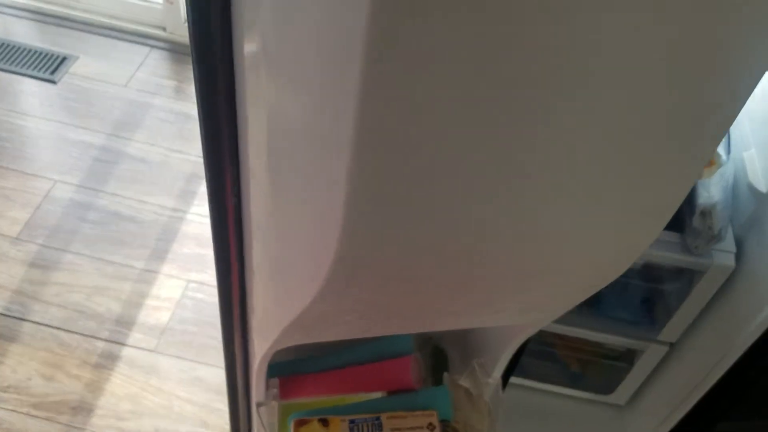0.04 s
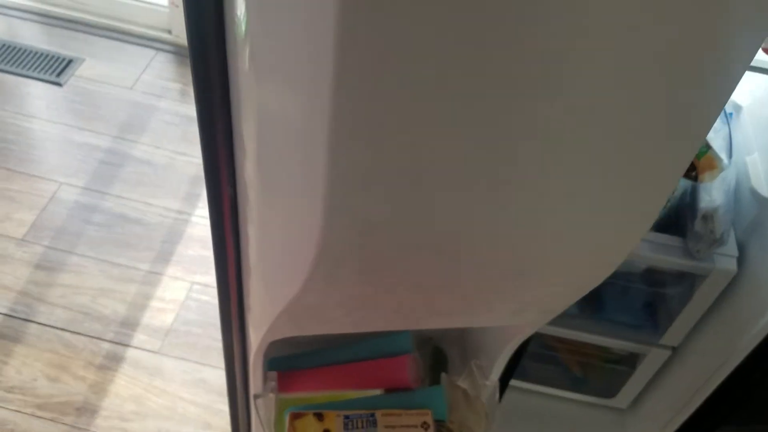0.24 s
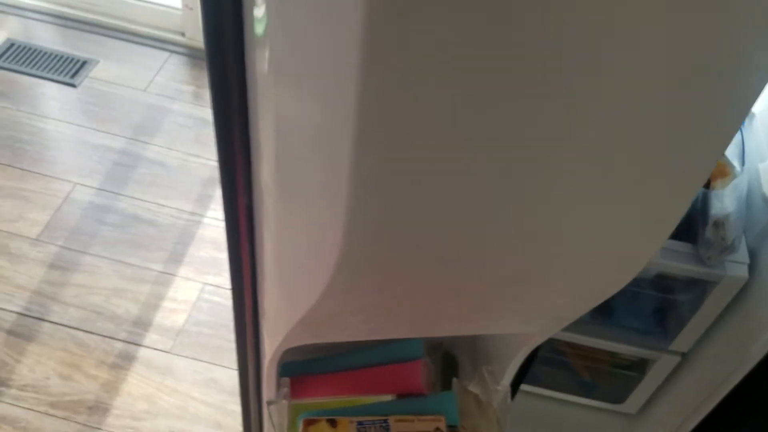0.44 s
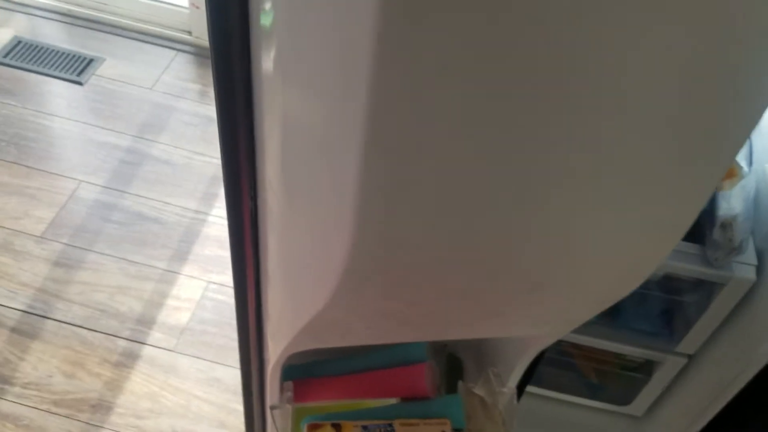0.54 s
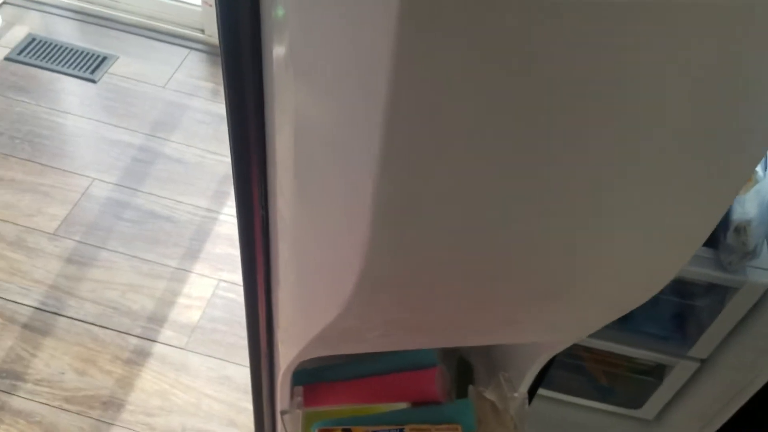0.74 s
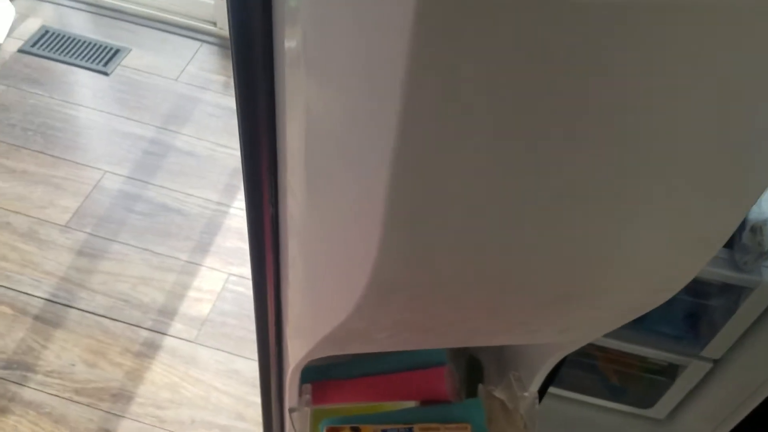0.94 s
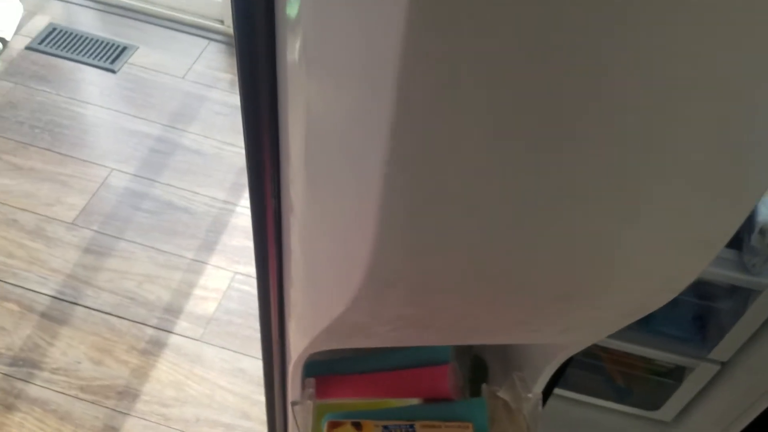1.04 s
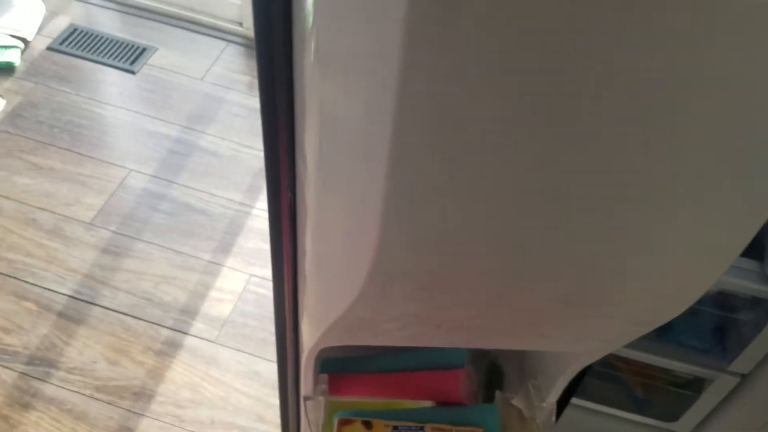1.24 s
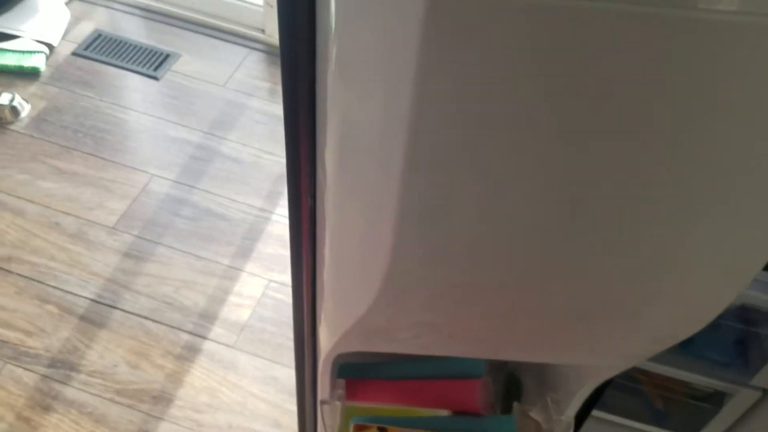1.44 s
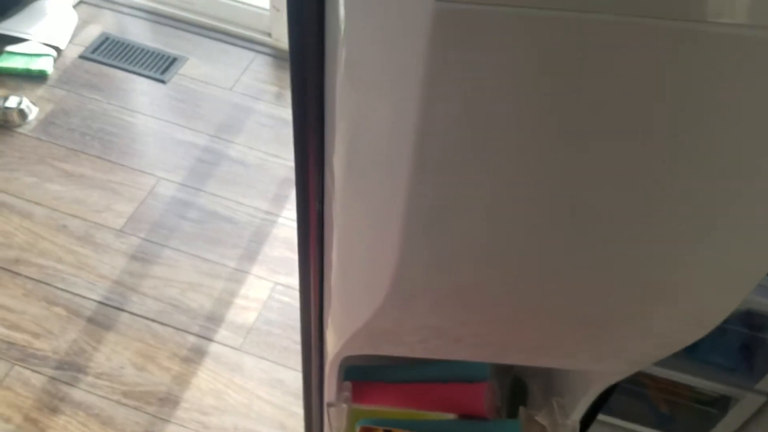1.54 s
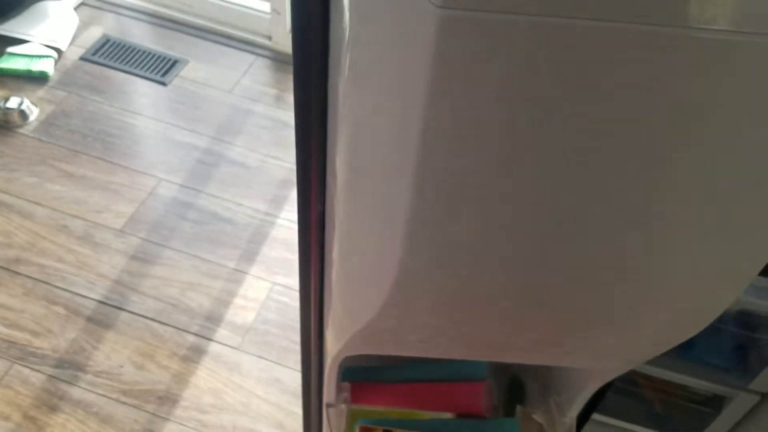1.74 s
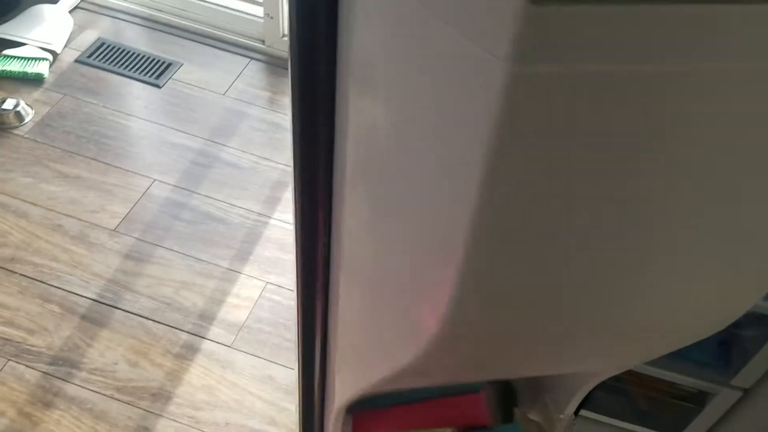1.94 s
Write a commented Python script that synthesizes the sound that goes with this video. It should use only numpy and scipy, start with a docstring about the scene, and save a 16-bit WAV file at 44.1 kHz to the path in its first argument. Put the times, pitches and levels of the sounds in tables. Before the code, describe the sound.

A refrigerator ice mechanism clatters in three loud bursts over a low room hum.

```python
"""Refrigerator ice mechanism.

It clatters in three bursts, close by and to the left, in a kitchen. Each knock thumps the cabinet,
clacks and chatters in the plastic bin and ticks in the treble; in the last burst a part snaps home.
Faint clicks and soft bumps come before and after, over a low whirr, a sliding hiss and the room's hum."""
import sys
import numpy as np
from scipy import signal
from scipy.fft import rfft, irfft
from scipy.io import wavfile

SR = 44100
rng = np.random.default_rng(int(sys.argv[2]) if len(sys.argv) > 2 else 0)


def transcribe(signal):
    """Save signal, clipped to [-1, 1], as a 16-bit WAV file at the path in sys.argv[1]."""
    frames = np.atleast_2d(signal).T
    limited = np.clip(frames, -1, 1)
    pcm = np.round(limited * 32767).astype(np.int16)
    wavfile.write(sys.argv[1], SR, pcm)


N = 88200


def undb(db):
    """Decibels to gain."""
    return 10 ** (np.asarray(db) / 20)


def stereo_noise():
    """Two independent channels of white noise."""
    return rng.standard_normal((2, N))


def curve(hz, table, column=1):
    """Read a table on a log-frequency axis."""
    table = np.array(table, float)
    return np.interp(np.log(np.maximum(hz, 1)), np.log(table[:, 0]), table[:, column])


def envelope(levels):
    """Gain through points (s, dB)."""
    times_s, db = np.array(levels).T
    return undb(np.interp(np.arange(N) / SR, times_s, db))


def colour(x, spectrum):
    """Minimum-phase filter of unit power through points (Hz, dB)."""
    size = 2 * N
    gain = undb(curve(np.arange(N + 1) * SR / size, spectrum))
    cepstrum = irfft(np.log(gain / np.sqrt(np.mean(gain ** 2))))
    cepstrum[1:N] *= 2
    cepstrum[N + 1:] = 0
    return irfft(rfft(x, size) * np.exp(rfft(cepstrum)))[..., :N]


def hit_power(hits, decay_s):
    """Power that jumps at each hit (s, dB) and dies away."""
    starts_s, db = np.array(hits).T
    jumps = np.bincount(np.clip(starts_s * SR, 0, N - 1).astype(int), undb(db) ** 2, N)
    return signal.lfilter([1], [1, -np.exp(-2 / (decay_s * SR))], jumps + 1e-18)


def ring(modes, blows):
    """Modes (Hz, dB, T60 s) rung by blows (s, gain of every mode)."""
    hz, db, t60_s = np.array(modes, float).T[:, :, None]
    t = np.arange(SR // 2) / SR
    waves = undb(db - 60 * t / t60_s) * np.sin(2 * np.pi * hz * t)
    out = np.zeros(N + len(t))
    for start_s, gains in blows:
        i = max(int(start_s * SR), 0)
        out[i:i + len(t)] += gains @ waves
    return out[:N]


def shake(modes, starts_s, db):
    """Modes rung with a new mix at every knock, different on each side."""
    mix = rng.standard_normal((len(starts_s), 2, len(modes)))
    return np.array([ring(modes, zip(starts_s, undb(db)[:, None] * mix[:, side])) for side in range(2)])


# Room hum spectrum. Each row: frequency in Hz, relative density in dB.
HUM_SPECTRUM = [(15, -43.5), (25, -23.5), (43, -15.5), (206, 1.5), (301, -8), (439, -13.5), (531, -17.5),
                (607, -14), (695, -20), (1020, -24), (1260, -36), (2050, -26), (2840, -32.5), (6560, -45),
                (7510, -52.5), (13200, -41), (16000, -43.5)]


def room_hum(level_db=-48.5, left_bias_db=2):
    """The room's steady low noise."""
    balance = undb(np.array([[left_bias_db], [-left_bias_db]]) / 2)
    return undb(level_db) * colour(stereo_noise(), HUM_SPECTRUM) * balance


# Whirr spectrum. Each row: frequency in Hz, relative density in dB.
WHIRR_SPECTRUM = [(100, -20), (250, -3), (370, 6), (480, -4), (700, -15), (1400, -9), (3000, -26),
                  (6000, -36), (9000, -45.5), (12000, -40.5), (16000, -37.5)]
# Whirr envelope. Each row: time in seconds, level in dB.
WHIRR_LEVELS = [(0, -39.5), (.1, -45), (.17, -49), (.42, -47), (.55, -42), (.85, -58), (1.2, -56.5)]


def whirr():
    """The mechanism's low running noise."""
    return envelope(WHIRR_LEVELS) * colour(stereo_noise(), WHIRR_SPECTRUM)


# Faint clicks. Each row: start in seconds, relative clack and tick levels in dB, decay in seconds.
FAINT_CLICKS = [(.002, -42, -22, 0.0057), (.036, -37, -39, 0.0066), (0.082, -28, -42, .005),
                (.097, -45, -24, 0.0016), (0.109, -38, -20.5, .002), (1.483, -28.5, -38, 0.0063),
                (1.5784, -27.5, -16, 0.002), (1.594, -48, -28, .002), (1.641, -37, -37, 0.0045),
                (1.656, -35, -36, 0.0045), (1.697, -28, -24, 0.0082), (1.745, -40, -32, 0.0022),
                (1.897, -31, -25, 0.0056), (1.91, -33, -36, .007)]
# Plastic clack of clicks and knocks. Each row: frequency in Hz, relative density in dB.
CLACK_SPECTRUM = [(300, -20), (550, -1.5), (760, -16.5), (1000, -2.5), (1500, 1), (2050, -6.5), (2800, -8),
                  (4000, -18.5), (6500, -22), (12000, -51)]
# Treble tick of a click. Each row: frequency in Hz, relative density in dB.
CLICK_SPECTRUM = [(1000, -23), (2200, 10.5), (3400, 0.5), (5000, -5), (8000, -12), (10000, -18),
                  (12000, -4), (16000, -18)]
CLACK_DB, TICK_DB, CHATTER_DECAY_S = -17, -24, 0.03


def clicks(chatter_db=-13):
    """Light contacts: a clack with an after-rattle, and a tick."""
    clack_power = tick_power = 0
    for start_s, clack_db, tick_db, decay_s in FAINT_CLICKS:
        clack_power += hit_power([(start_s, clack_db)], decay_s)
        clack_power += hit_power([(start_s, clack_db + chatter_db)], CHATTER_DECAY_S)
        tick_power += hit_power([(start_s, tick_db)], decay_s)
    clacks = undb(CLACK_DB) * colour(np.sqrt(clack_power) * stereo_noise(), CLACK_SPECTRUM)
    ticks = undb(TICK_DB) * colour(np.sqrt(tick_power) * stereo_noise(), CLICK_SPECTRUM)
    return clacks + ticks


def panel_boom(start_s, db, hz, swell_s):
    """A damped panel swells and dies within a few cycles."""
    t = np.arange(SR // 10) / SR
    swell = t / swell_s * np.exp(1 - t / swell_s)
    out = np.zeros(N + SR)
    i = int(start_s * SR)
    out[i:i + len(t)] = undb(db) * swell * np.sin(2 * np.pi * hz * t)
    return out[:N]


# Cabinet bumps. Each row: start in seconds, level in dB, pitch in Hz, swell in seconds.
SOFT_BUMPS = [(0.083, -37.5, 386, 0.0037), (0.564, -31, 141.8, 0.0053), (1.463, -34, 150, .008),
              (1.4845, -20, 203.3, 0.0072), (1.488, -23.5, 135, 0.0075), (1.518, -28.5, 213, 0.0065),
              (1.714, -40, 194, 0.0073)]


def bumps():
    """Soft blows make a cabinet panel boom."""
    return sum(panel_boom(*bump) for bump in SOFT_BUMPS)


# Sliding hiss spectrum. Each row: frequency in Hz, relative density in dB.
SLIDE_SPECTRUM = [(600, -21), (2500, 2.5), (5000, 1.5), (7000, -2), (9500, -12.5), (12000, -1.5),
                  (16000, -5)]
# Sliding hiss envelope. Each row: time in seconds, level in dB.
SLIDE_LEVELS = [(.15, -77), (.195, -49), (.47, -62), (.54, -53.5), (.58, -54), (.7, -78), (1.28, -86),
                (1.4, -68.5), (1.45, -70.5), (1.49, -59), (1.54, -74), (1.64, -65.5), (1.8, -69.5)]


def slide():
    """Sliding parts hiss lightly."""
    return envelope(SLIDE_LEVELS) * colour(stereo_noise(), SLIDE_SPECTRUM)


def contact(starts_s, db, decay_s, chatter_db=-8.5, grit_db=2.5, grit_hz=1103.4):
    """Each hit is a brief gritty crack; loose parts chatter on behind it."""
    hits = list(zip(starts_s, db))
    power = hit_power(hits, decay_s) + undb(chatter_db) ** 2 * hit_power(hits, CHATTER_DECAY_S)
    grain_index = (np.arange(N) * grit_hz / SR).astype(int)
    grit = undb(grit_db * rng.standard_normal(N))[grain_index]
    return np.sqrt(power / np.mean(grit ** 2)) * grit * stereo_noise()


# Cabinet thump spectrum. Each row: frequency in Hz, relative density in dB.
THUMP_SPECTRUM = [(25, -28), (60, -17.5), (110, 0.5), (170, 7), (290, 0), (440, -1), (620, -5.5),
                  (800, -14), (1600, -48)]


def thumps(starts_s, db, centres_hz, level_db=-21, db_per_octave=-4.5):
    """Dull rumble of the knocks; harder, higher ones carry less of it."""
    tilt_db = db_per_octave * np.log2(centres_hz / centres_hz.mean())
    rumble = contact(starts_s, db + tilt_db, decay_s=0.018, chatter_db=-9, grit_db=1.5)
    return undb(level_db) * colour(rumble, THUMP_SPECTRUM)


# Cabinet modes. Each row: frequency in Hz, relative level in dB, T60 in seconds.
CABINET_MODES = [(98, -5.5, .12), (129, 2, 0.065), (140.5, -2.5, 0.34), (161.5, 0, 0.26), (192.3, -8, 0.38),
                 (230.6, -2, 0.49), (263, 2.5, 0.27), (286.3, -2, 0.25), (356.4, -2.5, 0.25),
                 (411, -1.5, 0.45), (424.8, 6, 0.24), (498, -3.5, 0.19), (557, -6.5, .28), (648, 1.5, 0.29)]


def cabinet(starts_s, levels_db, centres_hz, ring_db=-26.5, boom_db=-18, reach_octaves=0.78):
    """Each blow booms the struck panel and rings the modes near its centre frequency."""
    modes_hz = np.array(CABINET_MODES)[:, 0]
    polarity = (-1) ** np.arange(len(modes_hz))
    blows, booms = [], 0
    for start_s, db, centre_hz in zip(starts_s, levels_db, centres_hz):
        nearness = np.exp(-(np.log2(modes_hz / centre_hz) / reach_octaves) ** 2)
        blows.append((start_s, undb(db) * nearness * polarity))
        booms += panel_boom(start_s, db + boom_db, centre_hz, swell_s=0.0032)
    return undb(ring_db) * ring(CABINET_MODES, blows) + booms


def loose_pieces(starts_s, levels_db, count=4, level_db=-25.5):
    """Every knock jolts a few pieces, each ringing briefly at its own pitch."""
    centre_hz, spread_octaves, decay_cycles, scatter_s = 1890, 1.3, 7.6, 0.005
    t = np.arange(2048) / SR
    out = np.zeros((2, N + SR))
    for start_s, db in zip(starts_s, levels_db):
        for pitch, delay, left, right in rng.standard_normal((count, 4)):
            hz = centre_hz * 2 ** (spread_octaves * np.tanh(pitch))
            wave = np.exp(-t * hz / decay_cycles) * np.sin(2 * np.pi * hz * t)
            i = int((start_s + abs(delay) * scatter_s) * SR)
            out[:, i:i + len(t)] += undb(db) * np.sign([[left], [right]]) * wave
    return undb(level_db) * out[:, :N]


# Mechanism knocks. Each row: start in seconds, thump level in dB, thump centre in Hz,
# clack level in dB, tick level in dB. Levels are relative.
MECHANISM_KNOCKS = [(0.19, -20, 250, -17, -35), (.2018, 3.5, 275, 4, 3.5), (.208, -1, 290, -6.5, 3),
                    (0.216, 1.5, 330, -1, -19), (0.228, -0.5, 300, -1.5, -17), (.2696, 0.5, 330, -0.5, 0.5),
                    (0.28, -5, 330, 0, -5), (.287, -3, 300, 5, -2), (.297, 1.5, 330, -3.5, -13),
                    (.311, -4, 300, -9.5, -8), (0.3268, 1, 149, 3, -1.5), (.339, -1, 200, -3.5, -8.5),
                    (.356, 0.5, 300, -11, -6), (0.4274, -20, 397, -17.5, -15),
                    (0.501, -34, 350, -20.5, -34), (0.582, 4.5, 190, 0.5, -1), (0.593, 1.5, 200, 2, -8),
                    (0.603, -2.5, 159.2, 3.5, 6.5), (0.617, -3.5, 170, 2.5, -9), (.630, -0.5, 200, 1.5, -3),
                    (0.645, -2.5, 190, -6.5, -12.5), (0.662, -0.5, 190, -9.5, -14.5),
                    (.677, 1.5, 190, -8.5, -20), (0.6865, 3.5, 180, 4, 4), (.694, -18, 180, 1, -8),
                    (.706, 0, 190, 1.5, -11.5), (0.726, -8, 170, 0, -2.5), (.744, -8.5, 170, -12.5, -23),
                    (0.7673, -5.5, 170, -6, -15), (.797, -10.5, 180, -13, -25.5),
                    (0.823, -16.5, 170, -33, -33), (0.8696, 2.5, 220, -2, -5.5),
                    (.891, 0.5, 240, -7, -20.5), (.911, -0.5, 240, 2, -3.5), (0.9199, 3.5, 220, 3, 4),
                    (.926, 5, 236, -8, -7), (.937, 0, 200, -4, -15), (.95, -12, 200, -11.5, -18),
                    (.974, -19.5, 200, -13, -28), (.995, -13.5, 190, -17, -29), (1.041, -13, 190, -20, -24),
                    (1.065, -17.5, 180, -25.5, -39)]
# Treble tick of a knock. Each row: frequency in Hz, relative density in dB.
TICK_SPECTRUM = [(1200, -26), (3000, 12), (4500, 0), (6500, -1.5), (8000, -4), (10000, -7), (11500, 0.5),
                 (14000, 0), (16000, -5)]
# Plastic bin modes. Each row: frequency in Hz, relative level in dB, T60 in seconds.
BIN_MODES = [(862, -1, 0.35), (895.5, 2.5, 0.41), (1050, -14.5, 0.18), (1204, 3.5, 0.16),
             (1235, -3.5, 0.38), (1293, -5, .25), (1365, 4, 0.33), (1565, -1, 0.28), (1610, -5.5, 0.17),
             (2151, 3, .2), (2490, 0.5, 0.187), (2640, -8.5, 0.2), (2904, -34, .2), (3470, -1, 0.089)]
# Modes of thin metal parts. Each row: frequency in Hz, relative level in dB, T60 in seconds.
METAL_MODES = [(6250, 0, .11), (7600, -3, .11), (11250, -1, .17), (11680, -4, .32), (12750, -1, .14),
               (13050, -3, .12), (14200, 1, .13)]


def knocks(bin_db=-41, ping_db=-45, ping_until_s=0.74):
    """Knocks shake the bin, metal parts and cabinet. Returns the clatter and the cabinet's tone."""
    starts_s, thump_db, centres_hz, clack_db, tick_db = np.array(MECHANISM_KNOCKS).T
    rumble = thumps(starts_s, thump_db, centres_hz)
    clacks = undb(CLACK_DB) * colour(contact(starts_s, clack_db, decay_s=0.005), CLACK_SPECTRUM)
    ticks = undb(TICK_DB) * colour(contact(starts_s, tick_db, decay_s=0.0042), TICK_SPECTRUM)
    bin_ring = undb(bin_db) * shake(BIN_MODES, starts_s, clack_db)
    early = starts_s < ping_until_s
    pings = undb(ping_db) * shake(METAL_MODES, starts_s[early], tick_db[early])
    clatter = rumble + clacks + ticks + bin_ring + pings + loose_pieces(starts_s, clack_db)
    return clatter, cabinet(starts_s, thump_db, centres_hz)


# Modes of the snapping part. Each row: frequency in Hz, relative level in dB, T60 in seconds.
SNAP_MODES = [(1130, -0.5, .04), (1400, 4.5, 0.022), (1690, 4, 0.042), (2413, -1, 0.037), (3020, -4, .04),
              (4050, 1, 0.019), (4610, 1, 0.03), (4980, -3.5, 0.023), (5400, -3, 0.03), (6230, -4.5, .04)]


def snap(start_s=0.9198, level_db=-17):
    """One part snaps home with a hard, short ring."""
    polarity = (-1) ** np.arange(len(SNAP_MODES))
    return undb(level_db) * ring(SNAP_MODES, [(start_s, polarity)])


# Catch modes. Each row: frequency in Hz, relative level in dB, T60 in seconds.
CATCH_MODES = [(1910, -7, 0.0087), (2520, -1, .007), (3220, -2, .009), (5600, -10.5, .006),
               (12500, -9, .008)]


def catch(start_s=1.5778, level_db=-38):
    """A small catch rings in the clearest of the faint clicks."""
    return undb(level_db) * ring(CATCH_MODES, [(start_s, np.ones(len(CATCH_MODES)))])


# Kitchen reverberation. Each row: band centre in Hz, level in dB, T60 in seconds.
REVERB_BANDS = [(100, -4.5, 0.57), (250, -13.5, 0.43), (600, -8, 0.37), (1390, -13, 0.41),
                (2930, -6.5, 0.41), (6470, -11.5, 0.33), (12000, -12, 0.2)]


def kitchen(x, build_s=0.0096):
    """A diffuse tail that dies sooner in the treble."""
    t = np.arange(SR) / SR
    hz = np.arange(SR // 2 + 1)
    centres_hz = np.array(REVERB_BANDS)[:, 0]
    noise_spectrum = rfft(rng.standard_normal((2, SR)))
    tail = 0
    for (_, db, t60_s), weights in zip(REVERB_BANDS, np.eye(len(REVERB_BANDS))):
        band = np.sqrt(curve(hz, list(zip(centres_hz, weights))))
        shape = undb(-60 * t / t60_s) * (1 - np.exp(-t / build_s))
        tail += undb(db) * irfft(noise_spectrum * band) * shape / np.sqrt(np.sum(shape ** 2))
    return signal.fftconvolve(x, tail, axes=1)[:, :N]


# Stereo image. Each row: frequency in Hz, left minus right in dB, coherence from 0 to 1.
STEREO_IMAGE = [(50, -4, 0.83), (150, 0.5, 0.97), (300, 1.8, 0.93), (550, 4, 0.88), (1100, 6.5, 0.59),
                (2200, 9.5, 0.01), (4500, 10.5, 0), (8000, 8.5, 0), (12500, 11.5, 0)]


def microphones(pair, lean=1):
    """Bass is alike on both sides; the treble favours the left unless lean is 0."""
    hz = np.arange(N + 1) * SR / (2 * N)
    coherence = np.clip(curve(hz, STEREO_IMAGE, column=2), 0, 1)
    pan = undb(lean * curve(hz, STEREO_IMAGE))
    left, right = rfft(pair, 2 * N)
    right = coherence * left + np.sqrt(1 - coherence ** 2) * right
    equal_power = np.sqrt(2 / (1 + pan ** 2))
    return irfft(np.array([left * pan, right]) * equal_power)[:, :N]


def scene():
    """The refrigerator to the left, room hum all round."""
    clatter, body = knocks()
    snapped = snap()
    # The cabinet's ring and the snap are drier than the clatter.
    loud_reverb = kitchen(clatter + undb(-3) * body + undb(-7) * snapped)
    running = whirr() + slide()
    clicking = clicks() + catch()
    bumping = bumps()
    faint_reverb = kitchen(undb(-1) * clicking + undb(-6.5) * bumping)
    direct = clatter + body + snapped + running + clicking + bumping
    return microphones(direct + loud_reverb + faint_reverb) + microphones(room_hum(), lean=0)


def record(dry, ceiling=1.3, top_hz=15900):
    """The recorder rounds the highest peaks and cuts the top."""
    rounded = ceiling * np.tanh(dry / ceiling)
    return signal.sosfilt(signal.ellip(10, 0.2, 80, top_hz, fs=SR, output="sos"), rounded)


dry = scene()
out = record(dry)
transcribe(out)
```